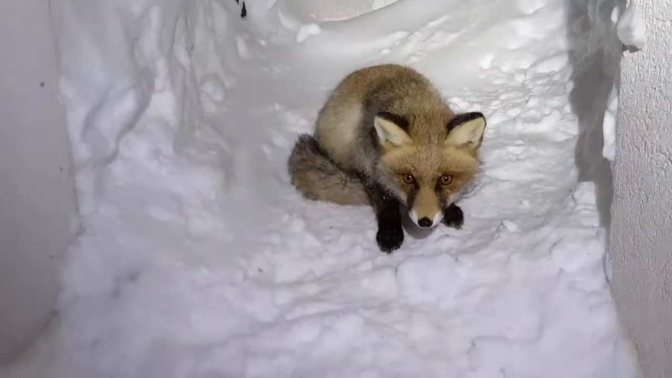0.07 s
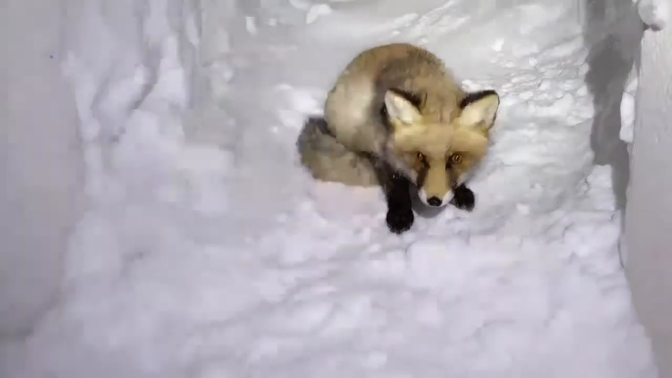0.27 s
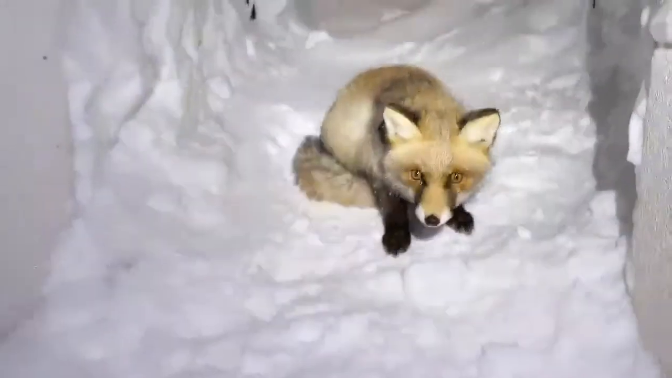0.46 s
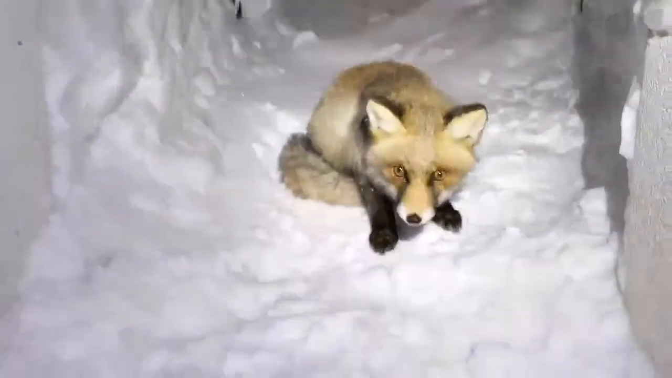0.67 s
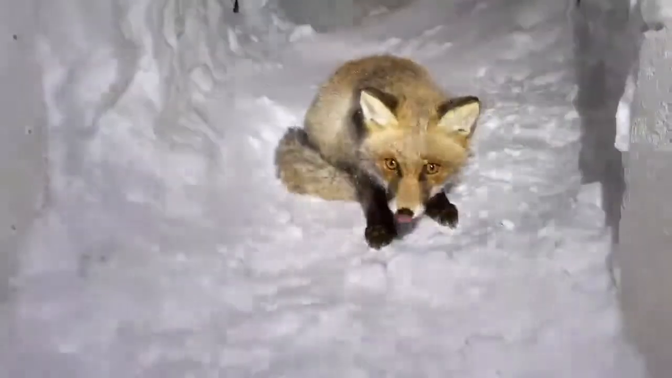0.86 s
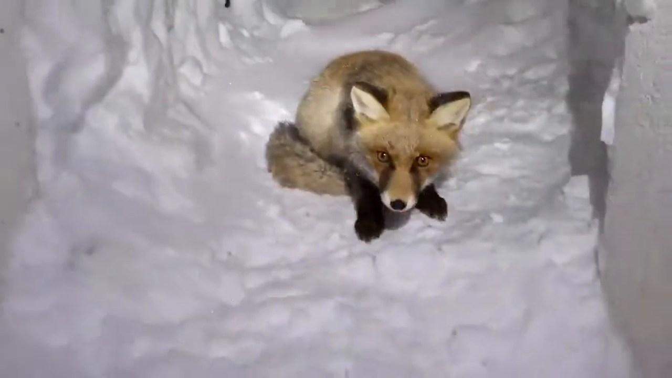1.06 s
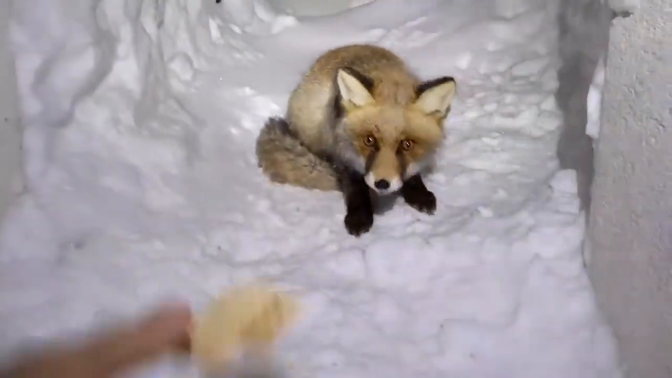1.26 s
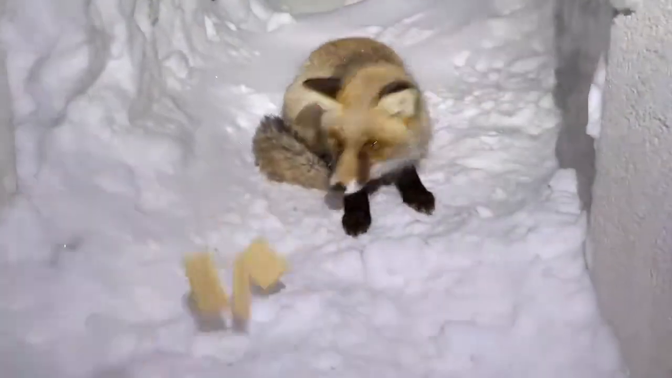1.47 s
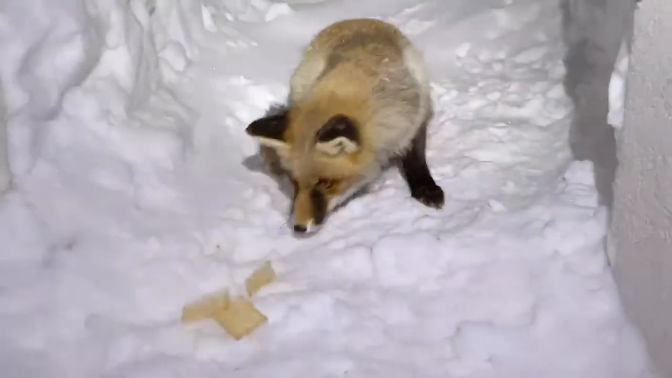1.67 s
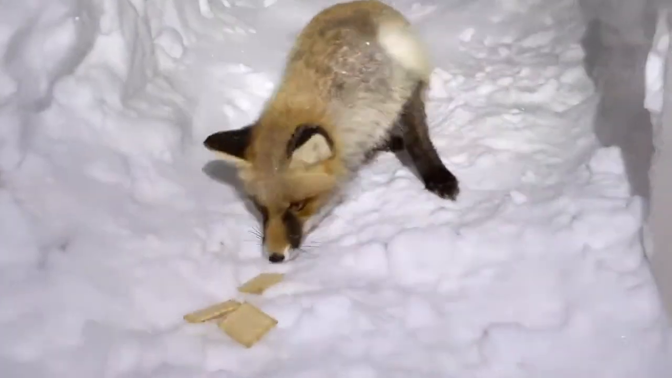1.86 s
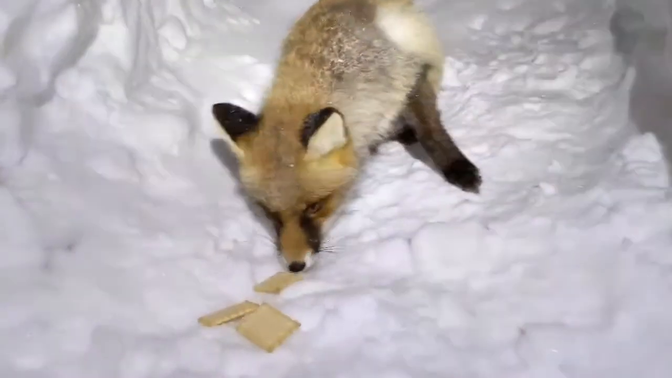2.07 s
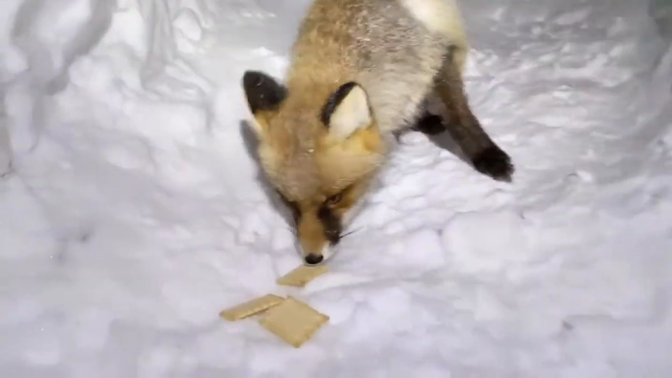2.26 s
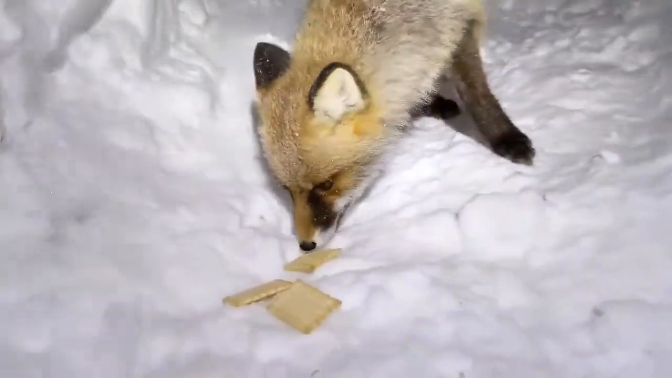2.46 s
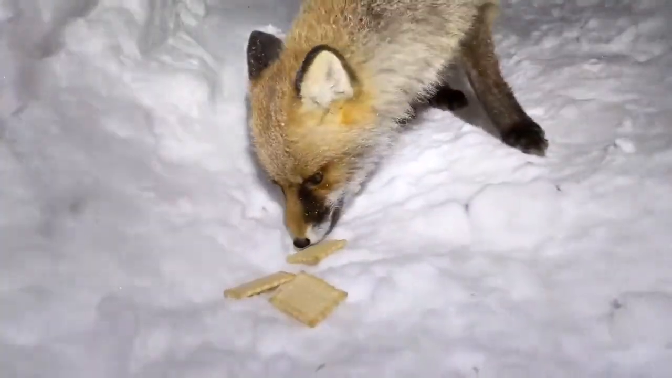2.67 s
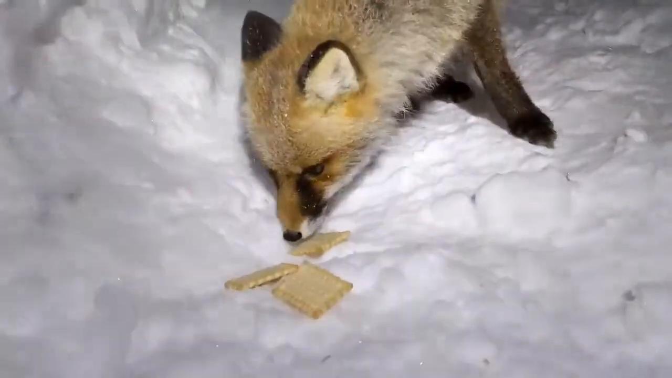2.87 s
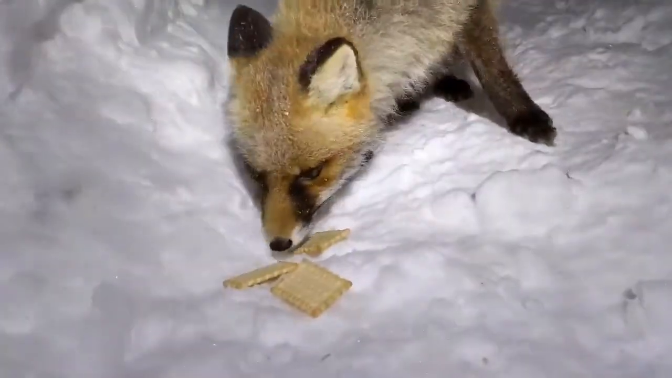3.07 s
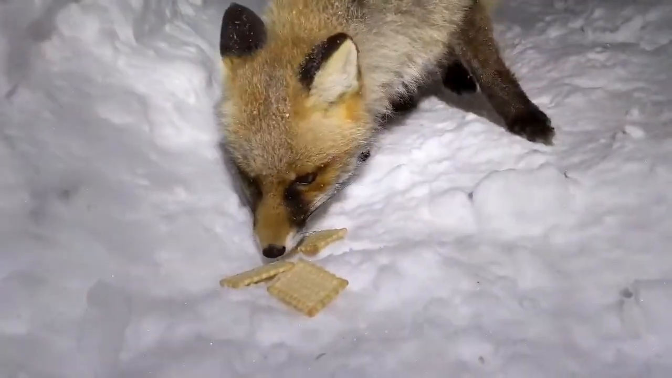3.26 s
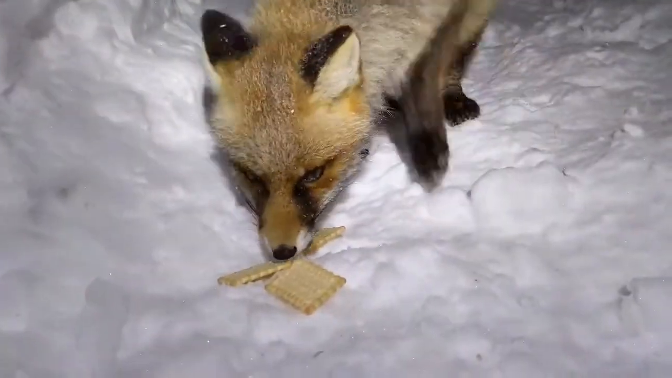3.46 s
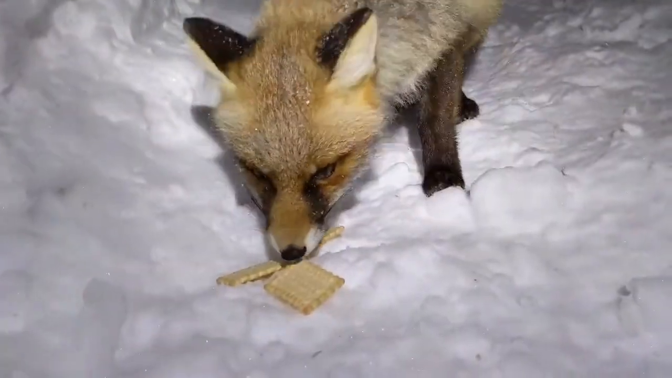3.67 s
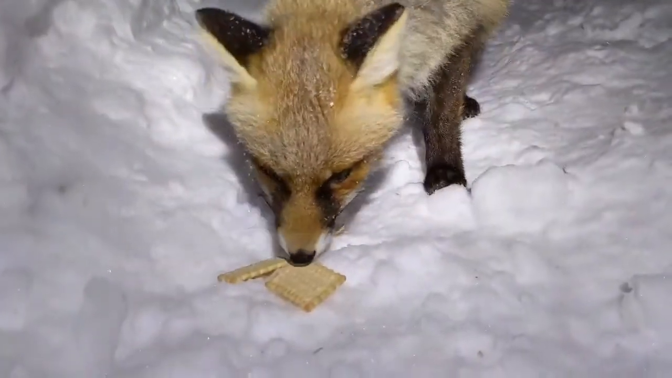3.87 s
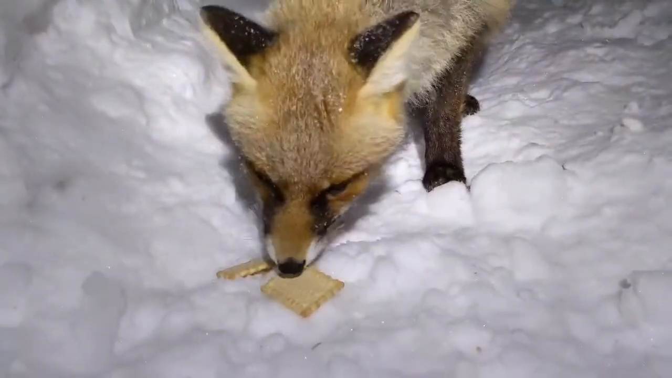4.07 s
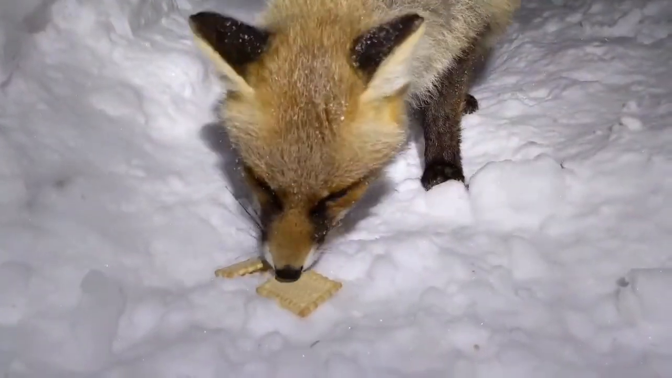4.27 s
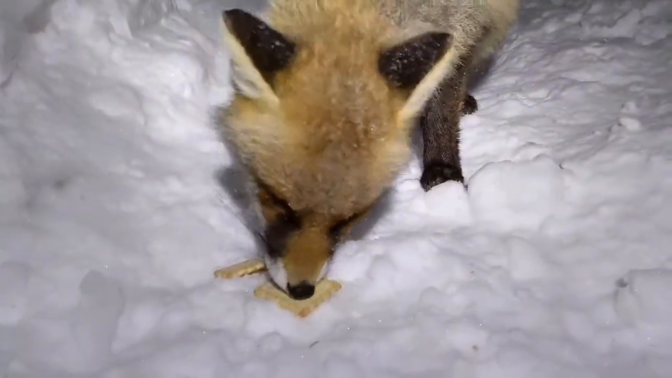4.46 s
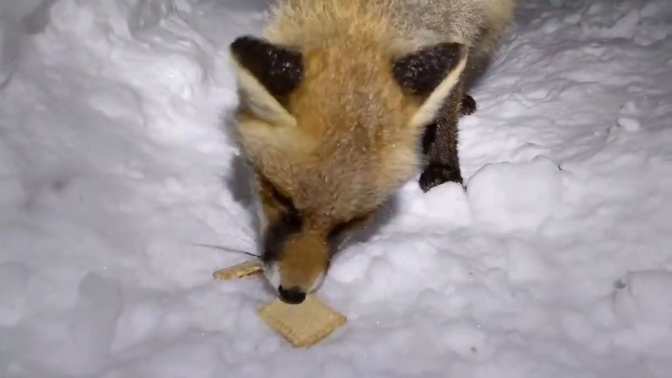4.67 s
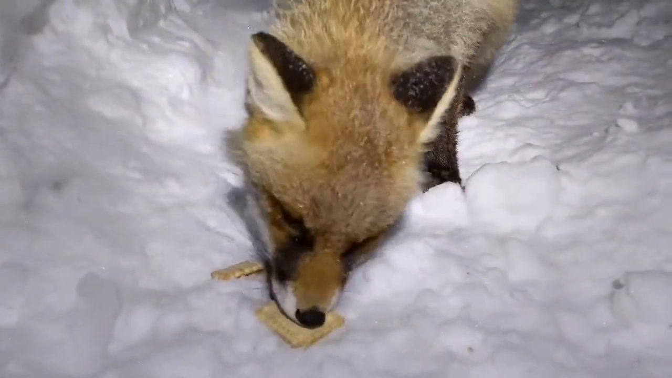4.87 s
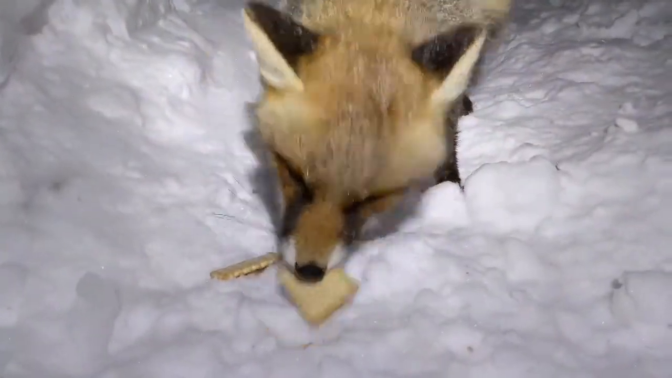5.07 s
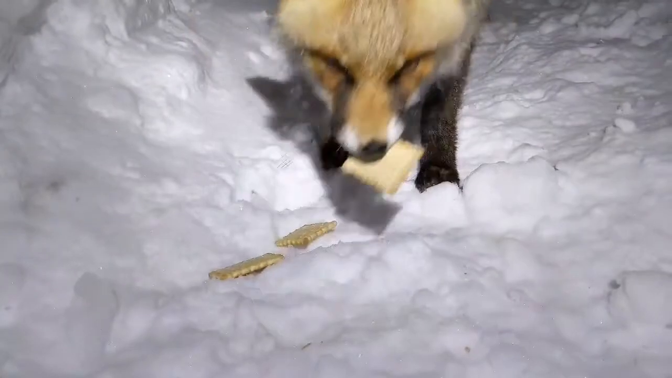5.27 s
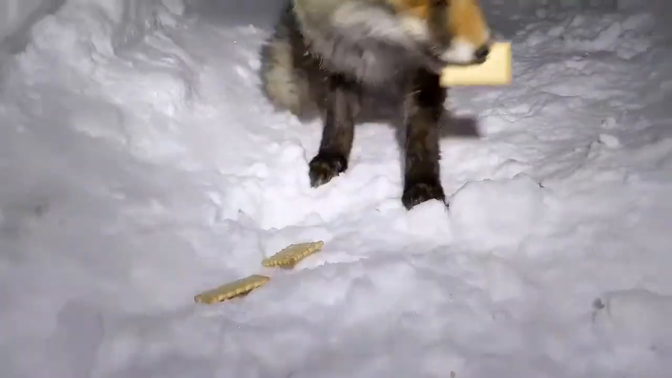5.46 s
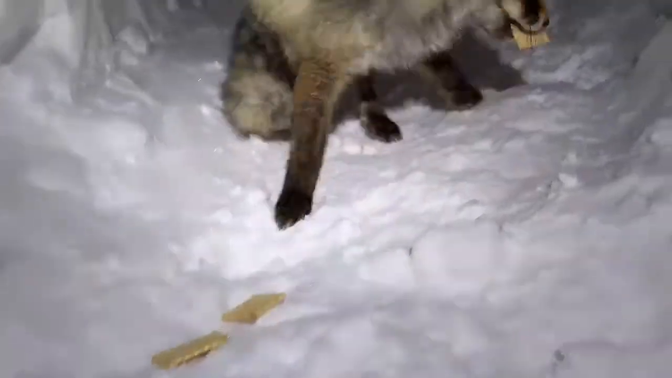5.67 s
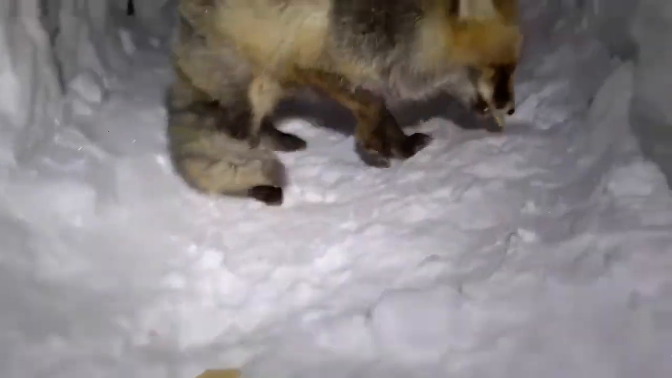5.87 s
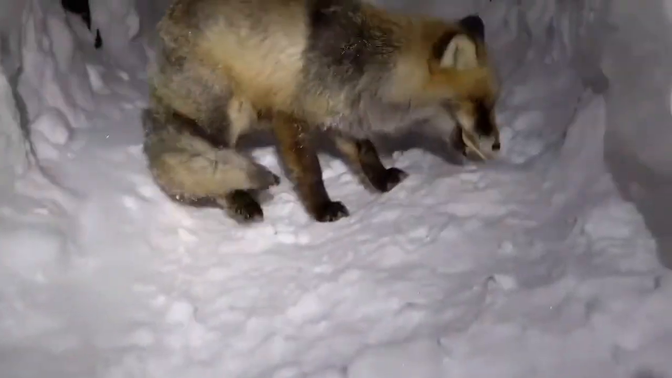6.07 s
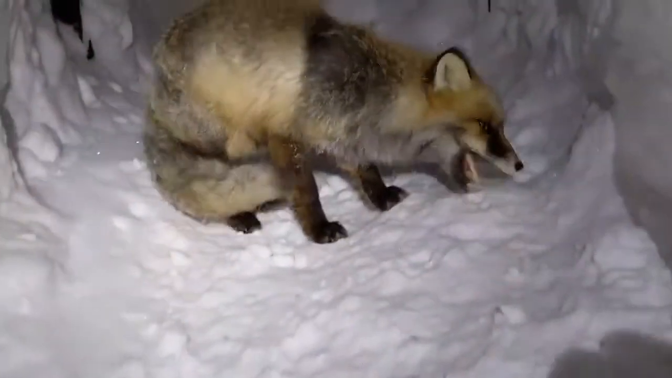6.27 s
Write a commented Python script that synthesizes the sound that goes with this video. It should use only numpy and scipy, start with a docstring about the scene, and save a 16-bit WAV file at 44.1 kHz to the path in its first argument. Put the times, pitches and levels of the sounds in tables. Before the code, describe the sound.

After a very short silence, soft hiss opens and clothing rubs near the microphone in several strokes. A hard crisp burst marks crackers landing on frozen snow. Rustling fades into small crunches and muffled handling bumps. Later, brittle crackles, clicking ticks and faint tooth snaps come in irregular clusters, over a faint snowy tread that grows as the fox turns. Close, dry stereo, hardly any echo.

```python
"""Night in a snowed-in doorway, a fox close to a hand-held camera with a two-port microphone, over air and hiss.
After a short silence a sleeve rustles and rubs the camera (filtered noise); near 1.5 s crackers hit the crust.
From about 1.7 s snow crunches and presses (swarms of noise grains, ringing lumps), at first under the sleeve
and bumps of fingers (low decaying sines); the fox's tread joins at 2.8 s, louder as it backs off and turns.
Teeth snap at a cracker (short rings) near 4 s and after 6 s; small dull ticks are sprinkled throughout."""
import sys
import numpy as np
from scipy import signal
from scipy.fft import rfft, irfft
from scipy.io import wavfile
from scipy.ndimage import uniform_filter1d

SR = 44100
rng = np.random.default_rng(int(sys.argv[2]) if len(sys.argv) > 2 else 0)


def unload_audio(sound):
    """Save the sound as a 16-bit wav file, at the path given as the first command line argument."""
    columns = np.transpose(np.atleast_2d(sound))
    # keep every value between -1 and 1, then stretch to whole-number steps
    steps = np.round(np.clip(columns, -1, 1) * 32767)
    wavfile.write(sys.argv[1], SR, steps.astype(np.int16))


N = 278712


def gain_of(db):
    """Decibels to gain."""
    return 10 ** (np.asarray(db) / 20)


def evened(x):
    """Scales to rms 1."""
    return x / np.sqrt(np.mean(x ** 2) + 1e-20)


def read(points, hz):
    """Reads a table on a log-frequency axis."""
    f, value = np.transpose(points)
    return np.interp(np.log(hz + 1), np.log(f + 1), value)


def coloured(points):
    """Turns a colour table into the gain(hz) that grains() asks for."""
    return lambda hz: gain_of(read(points, hz))


def add(mix, s, sound):
    """Adds a sound at time s."""
    part = mix[..., round(s * SR):][..., :sound.shape[-1]]
    part += sound[..., :part.shape[-1]]


def patchy(x, patch_db):
    """Lets the colour wander in patches some 250 Hz wide and 40 ms long."""
    z = signal.stft(x, nperseg=512, noverlap=256)[2]
    field = uniform_filter1d(rng.standard_normal(z.shape[1:]), size=3, axis=0)
    field = uniform_filter1d(field, size=7, axis=1)
    return signal.istft(z * gain_of(patch_db * evened(field)), nperseg=512, noverlap=256)[1][:, :N]


# likeness of the left and right ports: freq_hz, likeness (1 = identical)
PORT_LIKENESS = [(30, 0.178), (80, 0.77), (200, 0.524), (600, 0.78), (1200, 0.018), (8000, 0.009),
                 (14000, 0.8)]


def grains(gain, grain_s, spread_db, patch_db=5.0):
    """Two-port noise of rms 1, chopped into grains of uneven size, then coloured by gain(hz)."""
    size = uniform_filter1d(rng.standard_normal(N), max(round(grain_s * SR), 1))
    size = gain_of(spread_db * evened(size))
    a, b = rfft(size * patchy(rng.standard_normal((2, N)), patch_db))
    hz = np.fft.rfftfreq(N, 1 / SR)
    same = np.clip(read(PORT_LIKENESS, hz), -1, 1)
    right = same * a + np.sqrt(1 - same ** 2) * b
    return evened(irfft(np.array([a, right]) * gain(hz), N))


# colour of still night air and microphone hiss: freq_hz, density_db (per Hz, relative)
AIR_COLOUR = [(18, -46), (30, -24), (86, -4), (174, -8.5), (215, -12.5), (437, -27.5), (649, -24),
              (721, -15.5), (2120, -27.5), (3670, -29.5), (16000, -44.5)]
# lean of the air between the ports: freq_hz, left_over_right_db
AIR_SIDE = [(60, 7), (180, -3), (550, -0.5), (1650, 1.5), (4970, 4), (15000, -8)]
AIR_DB = -62.5


def air():
    """A smooth noise floor, a little lumpy, leaning to the left port in the deep bass."""
    def gain(hz):
        lean_db = np.c_[[.5, -.5]] * read(AIR_SIDE, hz)
        return gain_of(read(AIR_COLOUR, hz) + lean_db)
    return gain_of(AIR_DB) * grains(gain, 0.017, 0.85, patch_db=2.5)


def doorway(x):
    """Snow walls swallow most; sparse taps of random sign die by 60 dB in 0.16 s."""
    at = np.arange(200, 9000, 20) + rng.integers(0, 20, (2, 440))
    taps = np.zeros((2, 9020))
    np.put_along_axis(taps, at, rng.choice([-1., 1.], at.shape) * gain_of(-60 * at / SR / 0.16), 1)
    return signal.fftconvolve(x, taps / np.linalg.norm(taps[0]), axes=1)[:, :N]


# cavities of the microphone housing: freq_hz, width_hz, boost_db (overlapping boosts add)
HOUSING_CAVITIES = [(620, 76, 5), (1318, 140, 0.5), (1787, 47, 9.5), (2085, 8, 11.5), (4180, 49, 7),
                    (5230, 94, 3.5), (7460, 310, -4), (10090, 860, -1.5)]


def housing(x):
    """Colours the sound by the cavities round the ports, and by an echo off the snow that differs per port."""
    hz = np.fft.rfftfreq(N, 1 / SR)
    db = sum(g / (1 + (2 * (hz - f) / w) ** 2) for f, w, g in HOUSING_CAVITIES)
    echo_s = np.array([[.0031], [.0037]])
    echo = 1 + 0.25 * np.exp(-2j * np.pi * hz * echo_s)
    log_gain = np.log(gain_of(db))
    # causal phase: cavities ring after the sound
    lag = signal.hilbert(np.r_[log_gain, log_gain[-2:0:-1]]).imag[:len(hz)]
    return irfft(rfft(x) * np.exp(log_gain - 1j * lag) * echo, N)


# fingers on the camera: start_s, level_db (before the build-up and decay), pitch_hz
FINGER_BUMPS = [(1.939, -45, 169), (2.44, -39, 224), (2.528, -42.5, 226), (3.761, -48, 93),
                (4.917, -51, 140), (5.483, -47.5, 163)]


def fingers():
    """Soft low pushes through the camera body: sines that build in 2.9 ms and die by 60 dB in 68 ms."""
    out, t = np.zeros(N), np.arange(3000) / SR
    for s, level_db, hz in FINGER_BUMPS:
        shape = np.minimum(t / 0.0029, 1) * gain_of(-60 * t / 0.068)
        add(out, s, gain_of(level_db) * np.sin(2 * np.pi * hz * t) * shape)
    return out


# sleeve strokes: peak_s, rise_s, fall_s (each to 20 dB down), cloth_db, fine_fibres_db, camera_rub_db
SLEEVE_STROKES = [(.385, 0.033, 0.064, -56.5, -65, -57.5), (0.465, 0.078, 0.091, -56.5, -73, -57),
                  (0.677, 0.1, 0.11, -40.5, -48.5, -55.5), (0.783, 0.084, 0.17, -47.5, -52.5, -52),
                  (.85, 0.029, 0.031, -66, -51, -52.5), (1.06, 0.14, 0.25, -58.5, -80, -72),
                  (1.225, 0.22, 0.16, -48.5, -50.5, -65.5), (2.225, 0.051, 0.13, -52.5, -58, -56.5),
                  (2.29, 0.11, 0.093, -53.5, -73, -52), (2.56, 0.18, 0.14, -63, -84, -59.5)]
STROKE_SHAPE = 1.62  # 1 pointed, 2 rounded
# triples below are cloth, fibres, rub
IDLE_DB = (-62.5, -66.5, -69.5)  # between strokes
STILL_S, STILL_DB_PER_S = 2.554, -52  # the arm comes to rest
TOSS_S, TOSS_DB, TOSS_DB_PER_S = 1.58, (-48.5, -46.5, -62), (-25, -47, -7.5)  # settling after the throw


def sleeve_moves():
    """Gains of cloth, fibres and rub: an idle rustle, separate strokes, and the settling after the throw."""
    t = np.arange(N) / SR
    resting_db = STILL_DB_PER_S * np.maximum(t - STILL_S, 0)
    out = gain_of(np.c_[list(IDLE_DB)] + resting_db)
    settling_db = np.c_[list(TOSS_DB)] + np.c_[list(TOSS_DB_PER_S)] * (t - TOSS_S)
    out = np.hypot(out, (t > TOSS_S) * gain_of(settling_db + resting_db))
    for s, rise, fall, *dbs in SLEEVE_STROKES:
        spans = abs((t - s) / np.where(t < s, rise, fall))
        out = np.hypot(out, gain_of(np.c_[dbs] - 20 * spans ** STROKE_SHAPE))
    return out


# a hollow fold of the sleeve changes its pitch as the arm moves: time_s, pitch_hz
FOLD_PITCH = [(0.4, 1500), (0.68, 2200), (0.8, 1400), (1.25, 1800), (1.75, 1887), (1.97, 1360)]
FOLD_WIDTH_HZ, FOLD_DB = 200, 4


def fold(x):
    """Adds the ring of the fold, a resonance that follows its pitch curve."""
    pitch_hz = np.interp(np.arange(N) / SR, *np.transpose(FOLD_PITCH))
    turn = np.exp(2j * np.pi * np.cumsum(pitch_hz) / SR)
    r = np.exp(-np.pi * FOLD_WIDTH_HZ / SR)
    # shift the pitch down to zero, smooth, shift back up
    ring = (turn * signal.lfilter([1 - r], [1, -r], x / turn)).real
    return x + gain_of(FOLD_DB) * ring


# colour of cloth on cloth: freq_hz, density_db (per Hz, relative)
CLOTH_COLOUR = [(350, -16), (650, -14), (1000, -11.5), (1350, -2.5), (1750, -8), (2250, -6), (2900, -8.5),
                (4000, -13), (4550, -10), (5360, -11.5), (7340, -21.5), (8000, -29), (10400, -52.5)]
# modes of the camera body: freq_hz, width_hz, mode_db (relative)
BODY_MODES = [(202, 46, -2.5), (366, 60, -8.5), (640, 290, -13)]
# colour of the snow crust, whose top end also serves the fine fibres: freq_hz, density_db (per Hz, relative)
CRUST_COLOUR = [(1180, -36), (2000, -33), (2800, -14), (4120, 0.5), (6420, -1), (9000, 0.5), (13000, 1),
                (16000, -4)]


def sleeve():
    """Cloth slides on cloth; where it touches the camera, the body hums in its modes."""
    def body_gain(hz):
        return sum(gain_of(db) / np.hypot(1, 2 * (hz - f) / w) for f, w, db in BODY_MODES) * (hz > 120)
    cloth_gain, fibre_gain, rub_gain = sleeve_moves()
    body = grains(body_gain, 0.0072, 1.5, patch_db=3.5)
    fibres = grains(lambda hz: coloured(CRUST_COLOUR)(hz) * (hz > 6000), 0.0041, 1.5, patch_db=1.5)
    cloth = fold(grains(coloured(CLOTH_COLOUR), 0.0024, 1.8, patch_db=2.0))
    rub = gain_of([[-1.0], [1.0]]) * rub_gain * body
    rustle = gain_of([[1.2], [-1.2]]) * (cloth_gain * cloth + fibre_gain * fibres)
    return rub + rustle


# small dull ticks from a cloth fold or a clump of ice: start_s, level_db (before lift and decay), pitch_hz
DULL_TICKS = [(0.649, -34, 1100), (0.769, -37, 700), (0.811, -38.5, 500), (0.842, -56, 452),
              (2.443, -50, 2350), (2.532, -47, 2350), (2.542, -39, 1220), (4.0844, -28, 1300),
              (4.087, -23.5, 1300), (4.091, -38, 1540), (4.106, -29, 1370), (4.432, -41, 1630),
              (4.48, -41, 1100), (4.549, -40, 900), (4.6132, -33.5, 910), (4.619, -35, 1500),
              (4.65, -39, 1190), (4.912, -42, 594), (5.39, -48, 1500), (5.74, -44, 1640),
              (5.833, -45, 1710), (6.062, -39, 580), (6.067, -28.5, 1840), (6.1222, -36.5, 1710),
              (6.143, -42, 1100), (0.864, -35, 1800)]
TICK_CYCLES = 5.0  # to die by 60 dB


def ticks():
    """Each tick is a short sine push that dies within a few of its own cycles."""
    out, t = np.zeros(N), np.arange(800) / SR
    for s, level_db, hz in DULL_TICKS:
        decay = gain_of(level_db + 2.5 - 60 * t * hz / TICK_CYCLES)
        add(out, s, np.sin(2 * np.pi * hz * t) * np.minimum(t * hz / 0.69, 1) * decay)
    return out * gain_of([[.6], [-.6]])


def crunch(events, crust_colour, pack_colour, crust, pack):
    """Ice bonds break in swarms: a bright crust, duller packed snow, and a lump that rings at its own pitch."""
    crust, pack, lumps = np.array([crust, crust]), np.array([pack, pack]), np.zeros((2, N))
    t = np.arange(-SR // 10, SR // 5) / SR  # around the peak
    bonds = np.pad(grains(lambda hz: 1, 0.00051, 7.2), ((0, 0), (0, len(t))))
    for s, crust_db, pack_db, build, dying, pan_db, hz in events:
        start = s + t[0]
        swarm = gain_of(-20 * np.where(t < 0, -t / build, t / dying) ** 1.43)  # 20 dB down one span away
        swarm = swarm * gain_of([[pan_db / 2], [-pan_db / 2]])
        add(crust, start, gain_of(crust_db) * swarm)
        add(pack, start, gain_of(pack_db) * swarm)
        struck = swarm * bonds[:, round(start * SR):][:, :len(t)]
        ring = signal.lfilter(*signal.iirpeak(hz, 18.0, SR), struck)
        add(lumps, start, gain_of((crust_db + pack_db) / 2 + 14.5) * ring)
    bright = grains(coloured(crust_colour), 0.00091, 2.45, patch_db=4.0)
    dull = grains(coloured(pack_colour), .002, 3.2, patch_db=2.5)
    return crust * bright + pack * dull + lumps


# crackers landing: peak_s, crust_db, packed_snow_db, build_up_s, dying_s, ring_hz
CRACKER_LANDING = [(1.525, -44, -42, 0.016, 0.059, 1770), (1.536, -25.5, -42.5, 0.003, 0.023, 5030),
                   (1.547, -33, -35.5, 0.0067, 0.018, 5110), (1.555, -14, -33, 0.0085, 0.0047, 5120),
                   (1.561, -19, -42.5, .009, 0.0044, 5680), (1.574, -58, -45, 0.026, 0.082, 2100)]
# colours under the crackers, thin crust then firmer snow: freq_hz, density_db (per Hz, relative)
THIN_CRUST_COLOUR = [(1470, -54.5), (2500, -23), (4690, -9), (5070, -15.5), (7250, -5), (10500, 0),
                     (16000, -6)]
FIRM_SNOW_COLOUR = [(60, -40), (150, -12), (350, -14.5), (620, -18), (950, -18), (1400, -6), (2200, -8.5),
                    (3200, -17)]
LANDING_PAN_DB = 3  # left over right


def crackers():
    """Tossed crackers shatter the thin crust and thud on the firmer snow."""
    landing = [(*row, LANDING_PAN_DB, hz) for *row, hz in CRACKER_LANDING]
    return crunch(landing, THIN_CRUST_COLOUR, FIRM_SNOW_COLOUR, np.zeros(N), np.zeros(N))


# colour of the packed snow: freq_hz, density_db (per Hz, relative)
PACK_COLOUR = [(240, -13), (450, -11), (700, -14), (1340, -6), (1800, -9), (2690, -8.5), (3500, -12),
               (4550, -53), (7700, -120)]
# sudden cracks of the crust: peak_s, crust_db, packed_snow_db, dying_s, ring_hz
CRUST_CRACKS = [(2.441, -56, -51, 0.042, 2370), (2.532, -55, -49, 0.039, 2410),
                (2.59, -71, -57, 0.012, 1400), (3.51, -55.5, -62.5, 0.14, 2120),
                (3.998, -60, -65, 0.02, 5280), (4.027, -41, -50.5, 0.0066, 3920),
                (4.033, -47.5, -50.5, 0.015, 4100), (4.074, -59, -60, 0.013, 4000),
                (4.085, -42, -49.5, 0.0077, 1680), (4.089, -41, -46, 0.016, 1520),
                (4.105, -55, -56, 0.054, 1380), (4.201, -54.5, -60, 0.009, 3570),
                (4.286, -53, -61, 0.013, 4350), (4.404, -51.5, -61.5, 0.037, 1110),
                (4.453, -46, -56, 0.012, 5300), (4.458, -47, -65, 0.007, 5440),
                (4.503, -51.5, -61, 0.067, 1380), (4.524, -62, -56, 0.026, 1290),
                (4.651, -61, -59, 0.038, 1200), (4.801, -51.5, -53.5, 0.011, 5200),
                (4.918, -48, -51, 0.028, 5800), (5.053, -55.5, -66, 0.012, 1410),
                (5.477, -59.5, -65, 0.05, 1290), (5.722, -60, -56, 0.024, 1640),
                (5.801, -55, -59.5, 0.03, 1510), (6.021, -38, -60, 0.0079, 4140),
                (6.031, -49, -55, 0.0089, 3200), (6.069, -41.5, -43, 0.0081, 4140),
                (6.085, -66, -66, 0.0079, 2520), (6.148, -62, -51, 0.0092, 2620),
                (6.284, -57, -55, 0.006, 2550), (6.29, -47.5, -48.5, 0.015, 4750)]
# slower presses of the snow: peak_s, crust_db, packed_snow_db, dying_s, ring_hz
SNOW_PRESSES = [(1.72, -42, -62, 0.031, 1880), (1.938, -52, -53.5, 0.045, 1380),
                (2.92, -71, -95, 0.073, 1150), (3.342, -52.5, -62.5, 0.029, 4400),
                (3.394, -63.5, -73, 0.026, 4100), (3.424, -60.5, -67, 0.013, 4270),
                (3.53, -53.5, -70, 0.043, 6020), (3.965, -60, -67, 0.071, 1650),
                (4.434, -49, -60, 0.024, 1750), (4.545, -49, -64, 0.08, 1670),
                (4.597, -52.5, -55.5, 0.031, 4000), (4.617, -51, -55, 0.042, 3960),
                (4.89, -56, -60.5, 0.12, 1680), (4.929, -47.5, -55, 0.013, 5200),
                (4.955, -64, -66, 0.08, 1690), (5.002, -54.5, -60.5, 0.044, 1700),
                (5.027, -56, -61, 0.026, 5070), (5.101, -53.5, -57, 0.023, 2260),
                (5.7, -62.5, -74.5, 0.32, 2950), (5.989, -46.5, -62, 0.018, 4240),
                (6.064, -43.5, -52.5, 0.0095, 1836)]
CRACK_S, PRESS_SHARE = 0.003, 0.4  # build-up of a crack; build-up of a press as a share of its dying
TREAD_S, TREAD_DB = 2.8, (-74, -78)  # the fox's weight on crust and packed snow
TURN_S, TURNED_S, TURN_DB_PER_S = 4.72, 5.98, (9.5, 10.5)  # tread louder as it backs off and turns
CRUNCH_PAN_DB = 1  # left over right, cracks and presses


def crunching_snow():
    """Snow cracks suddenly and presses slowly; the fox's steady tread joins underneath."""
    t = np.arange(N) / SR
    turned_s = np.clip(t, TURN_S, TURNED_S) - TURN_S
    tread = (t > TREAD_S) * gain_of(np.c_[list(TREAD_DB)] + np.c_[list(TURN_DB_PER_S)] * turned_s)
    events = [(s, crust, pack, CRACK_S, dying, CRUNCH_PAN_DB, hz)
              for s, crust, pack, dying, hz in CRUST_CRACKS]
    events += [(s, crust, pack, PRESS_SHARE * dying, dying, CRUNCH_PAN_DB, hz)
               for s, crust, pack, dying, hz in SNOW_PRESSES]
    return crunch(events, CRUST_COLOUR, PACK_COLOUR, *tread)


# teeth on the cracker: start_s, level_db (before the ring's own levels)
TOOTH_SNAPS = [(4.027, -58), (6.0178, -40), (6.291, -54)]
# ring of the dry cracker: pitch_hz, level_db (added to the snap's), t60_s
CRACKER_RING = [(4210, 13, 0.011), (5150, 12.5, 0.009)]


def teeth():
    """Each snap rings the dry cracker for about a hundredth of a second."""
    out, t = np.zeros((2, N)), np.arange(3000) / SR
    for s, level_db in TOOTH_SNAPS:
        ring = sum(gain_of(db - 60 * t / t60) * np.sin(2 * np.pi * hz * t) for hz, db, t60 in CRACKER_RING)
        attack = np.minimum(t / 0.00028, 1)
        add(out, s, gain_of(level_db) * attack * ring * gain_of([[1.5], [-1.5]]))
    return out


def scene():
    """Everything near the camera, the short echo of the doorway, and the air."""
    snow, bite = crackers() + crunching_snow(), teeth()
    wet = doorway(gain_of(-11.0) * snow + gain_of(-12) * bite)
    near = housing(snow + wet + sleeve() + ticks())
    return near + bite + fingers() + air()


OPEN_S, EDGE_HZ = .043, 15700


def record(dry):
    """The recorder opens after a short silence, fading in over 8.9 ms; then the band limit."""
    opened = dry * np.clip((np.arange(N) / SR - OPEN_S) / 0.0089, 0, 1)
    band = signal.firwin(255, EDGE_HZ, window=("kaiser", 9), fs=SR)
    return signal.oaconvolve(opened, band[None], "same")


dry = scene()
out = record(dry)
unload_audio(out)
```